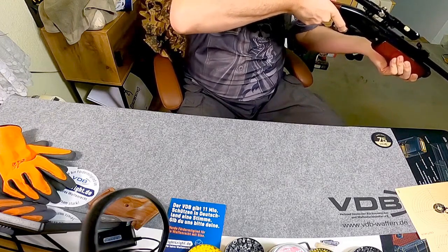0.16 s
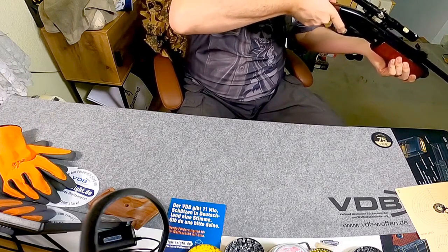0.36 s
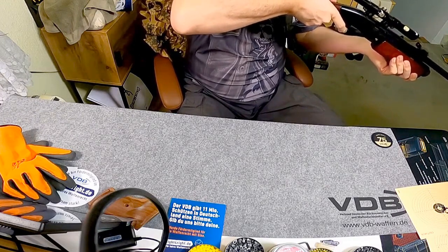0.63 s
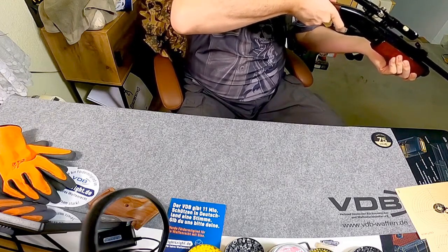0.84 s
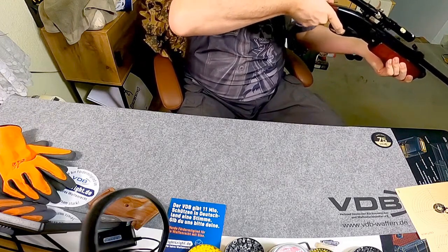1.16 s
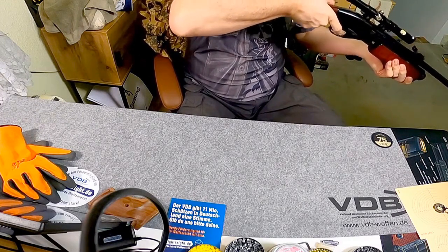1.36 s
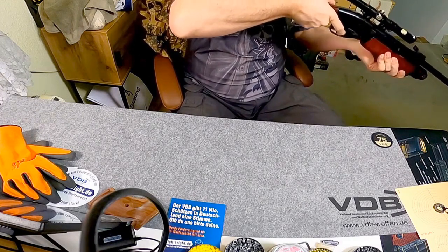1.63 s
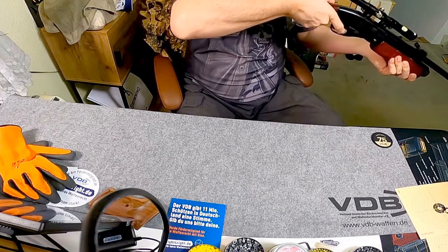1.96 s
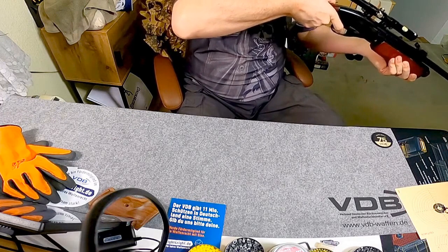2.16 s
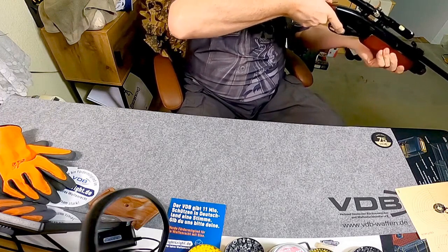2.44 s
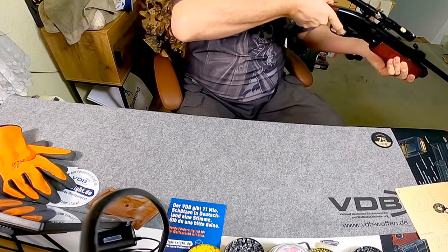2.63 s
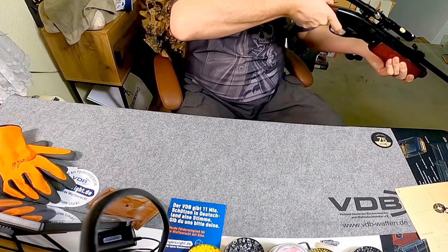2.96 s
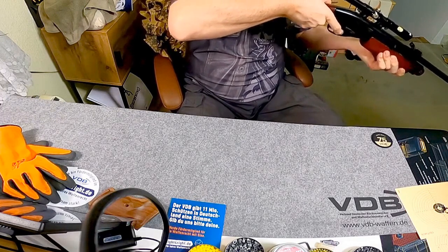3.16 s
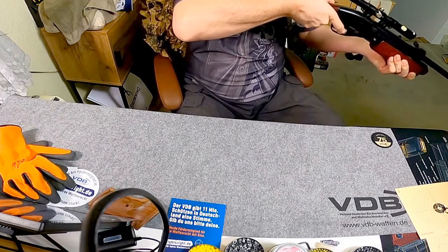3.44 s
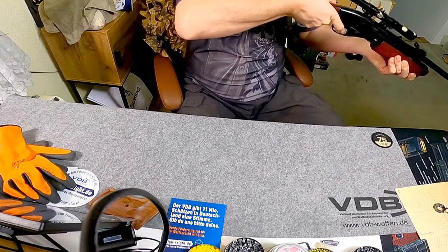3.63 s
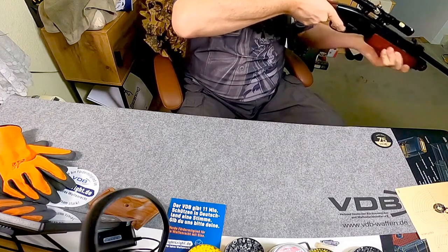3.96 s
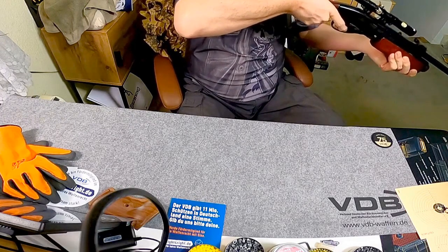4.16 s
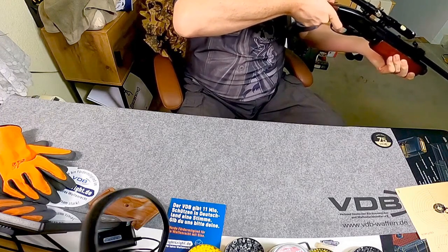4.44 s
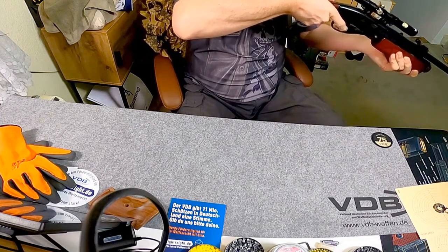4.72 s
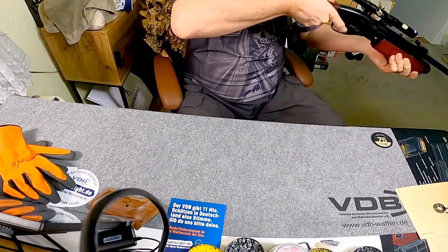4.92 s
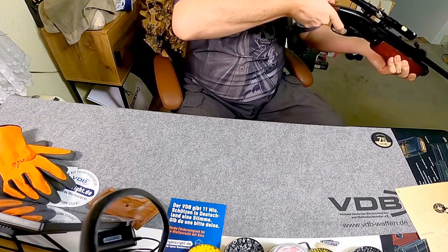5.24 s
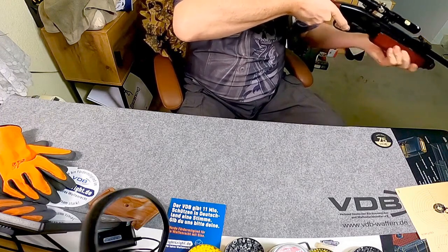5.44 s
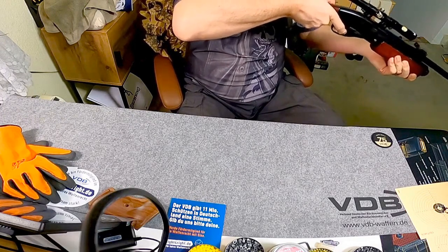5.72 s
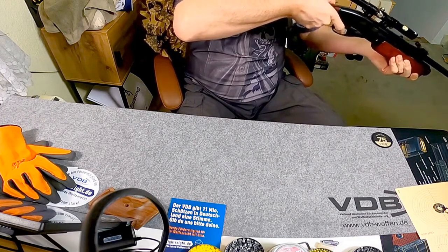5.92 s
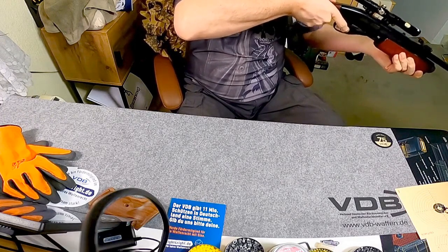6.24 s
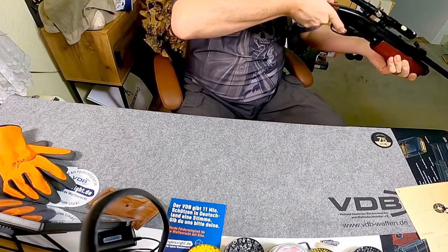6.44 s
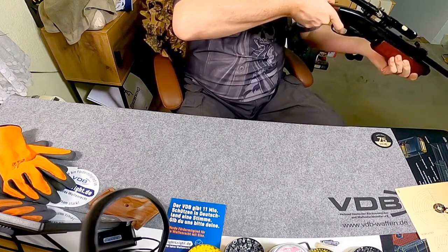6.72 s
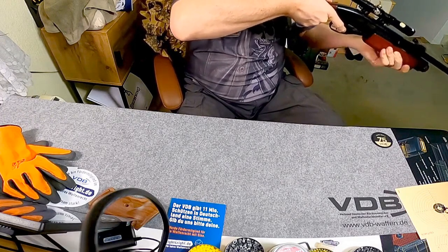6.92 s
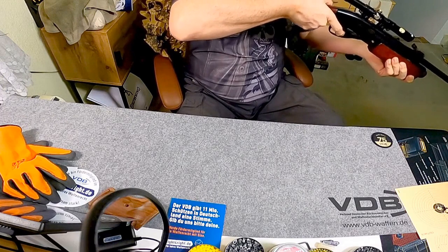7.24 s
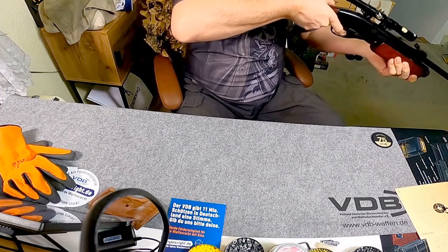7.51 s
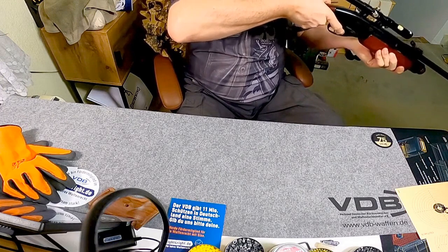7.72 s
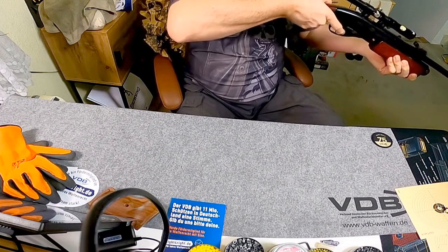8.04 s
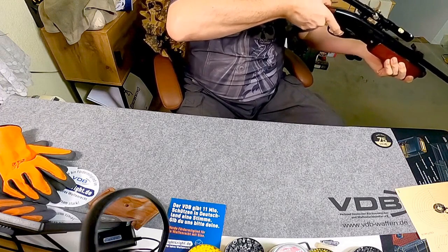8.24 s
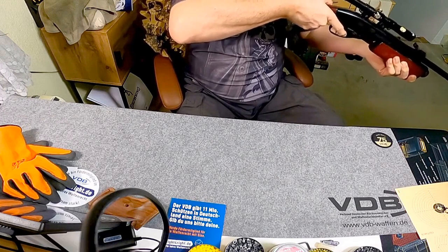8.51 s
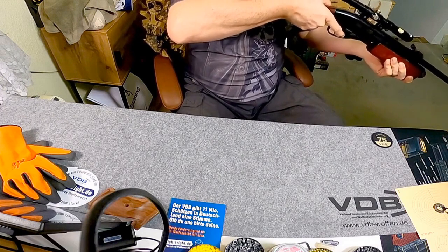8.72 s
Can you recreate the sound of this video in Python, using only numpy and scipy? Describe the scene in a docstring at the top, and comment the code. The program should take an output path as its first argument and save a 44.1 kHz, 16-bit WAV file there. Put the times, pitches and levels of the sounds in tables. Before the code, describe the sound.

A pump-action air rifle is cycled and fired eleven times in a small, quiet room, heard closely by one microphone in mono. At once two hard steel clacks, about a fiftieth of a second apart, leave a faint singing spring; near 0.15 s loose linkage rattles, and at 0.19 s the action shuts with a full clunk. After a pause, a light sear tick leads into a sharp, airy snap at 0.9 s. Almost fused with it, a pellet clangs on a steel trap, with scattering bits and a bright, fluttering ring of about a quarter second. Recocking starts around 1.15 s, and shots follow near 1.5, 2.2, 3.0, 3.8, 4.5, 5.3, 6.0, 6.8 and 7.6 s, slightly varied. The final cocking comes at 7.8 s; the shot at 8.4 s is only a snap and puff, without the steel ring. Faint hiss, low rumble and mains hum remain throughout.

```python
"""First come two hard clacks, a rattle and a clunk: a pump-action air rifle is cocked in a small, quiet room.
Then the sear ticks and the shot snaps, and the pellet rings a steel trap about a fiftieth of a second later.
Eleven such rounds follow each other; the last shot is empty, so the trap stays silent.
Blows are coloured noise bursts, ringing steel is a sum of modes, and near walls answer most contacts.
One microphone hears it all, over faint hiss, rumble and mains hum."""
import sys
import numpy as np
from scipy import signal
from scipy.fft import rfft, irfft, next_fast_len
from scipy.io import wavfile
from scipy.ndimage import uniform_filter1d

SR = 44100
rng = np.random.default_rng(int(sys.argv[2]) if len(sys.argv) > 2 else 0)


def master_out(mix):
    """Clip the mix to full scale and print it as 16-bit PCM to the path in sys.argv[1]."""
    frames = np.transpose(np.atleast_2d(mix))
    ceiling = np.clip(frames, -1, 1)
    pcm = np.round(ceiling * 32767).astype(np.int16)
    wavfile.write(sys.argv[1], SR, pcm)


N = 391166  # samples in the whole scene
SIZE, ONSET = 24576, 2205  # samples around one contact, and before it
T = (np.arange(SIZE) - ONSET) / SR  # seconds from the contact
AFTER = np.maximum(T, 0)


# the valve is struck and air leaves the muzzle: t/s, brightness/(dB per octave), sear lead/s, sear level/dB
SHOT_TIMES = [(0.9123, -0.5, 0.021, -18), (1.5098, 0.8, .016, -22), (2.2421, -0.5, 0.022, -23.5),
              (2.9711, -0.3, 0.018, -23), (3.7865, -0.5, .0205, -21.5), (4.545, 0, 0.019, -21),
              (5.271, 3, .02, -19), (5.9611, 1.5, .021, -22.5), (6.7762, 1, 0.025, -19),
              (7.5912, -0.5, .025, -17), (8.442, -1, 0.023, -20)]
# colour of the snap at the valve: f/Hz, level/(dB per Hz)
SNAP_COLOUR = [(40, -36), (95, -15), (150, 1), (230, -6.5), (350, -3), (600, -8.5), (1000, -14),
               (1600, -3.5), (3300, -3), (4280, 4.5), (5400, -1), (6400, -2), (8400, -15), (12400, -20.5),
               (15500, -36.5)]
# colour of the moving air: f/Hz, level/(dB per Hz)
AIR_COLOUR = [(40, -32), (95, -19), (155, -8), (230, -6), (450, -1), (750, -4), (1100, -6.5), (1700, -6.5),
              (3500, -11), (7200, -11.5), (13500, -16.5), (15500, -27.5)]
SHOT_DB = -5


def shots():
    """The sear lets go, the striker runs onto the valve, and a puff of air follows."""
    out = np.zeros(N)
    for s, bright_db, sear_lead, sear_db in SHOT_TIMES:
        sear = room(tick(), wet_db=5.0)
        add(out, s - sear_lead, amp(sear_db) * sear)
        run = amp(-16.5) * burst(AIR_COLOUR, swell(0.0098), tilt_db=0.5)
        snap = burst(SNAP_COLOUR, fade(0.024, attack=0.0016), bright_db)
        puff = amp(-12) * burst(AIR_COLOUR, fade(0.17, attack=0.0053), grain_db=0.0)
        add(out, s, amp(SHOT_DB) * room(run + snap + puff, wet_db=-4))
    return out


# pellets of the first ten shots, in order: flight/s, level/dB, ring level/dB, off-centre gain/dB
PELLET_HITS = [(.0235, -16, -4, -3), (.025, -17, -7, 3), (.022, -15, -10, -2), (.0225, -15, -8.5, -4.5),
               (.027, -16, -8.5, -5.5), (.0215, -15, -7.5, -4.5), (.0215, -13.5, -8.5, -1),
               (.0225, -15.5, -8, 3.5), (.017, -14.5, -7, 4.5), (.0215, -17, -6, 6)]
# colour of the blow on the trap: f/Hz, level/(dB per Hz)
CLANG_COLOUR = [(60, -54.5), (190, -25.5), (330, -4.5), (680, 1.5), (1000, -7), (1800, -2), (3300, -2.5),
                (4400, -5), (6500, -8.5), (9000, -12), (13600, -18.5), (15500, -35)]
# the trap's crowd of weak high modes
SHIMMER_LOW_HZ, SHIMMER_HIGH_HZ, SHIMMER_DB, SHIMMER_T60_S = 5980, 13000, -16.5, 0.2


def trap(count=30):
    """The pellet shatters on the steel box and its bits rattle; where it lands decides which modes ring most."""
    out = np.zeros(N)
    high_modes = [(hz, 0) for hz in rng.uniform(SHIMMER_LOW_HZ, SHIMMER_HIGH_HZ, count)]
    # the pellets run out before the last shot
    for (fired, *_), (flight, db, ring_db, off_centre_db) in zip(SHOT_TIMES, PELLET_HITS):
        impact = burst(CLANG_COLOUR, fade(0.028), tilt_db=2.0)
        rattle = fade(0.22, attack=0.0032) * amp(3.7 * wobble(299.9))
        bits = amp(-3.9) * burst(CLANG_COLOUR, rattle, tilt_db=-0.24)
        shimmer = amp(SHIMMER_DB) * ring(high_modes, scatter_db=5) * fade(SHIMMER_T60_S)
        steel = amp(ring_db) * plate(off_centre_db)
        hit = room(impact + bits, wet_db=-3.5) + shimmer + steel
        add(out, fired + flight, amp(db) * hit)
    return out


# modes of the steel trap: f/Hz, level/dB, share of the off-centre gain that the mode gets
TRAP_MODES = [(1857, -7.5, .3), (2654, -13, -.3), (3208, -8.5, 0), (3521, -7.5, .7), (4690, -15, 0),
              (4877, -8, 1.2), (5039, -1.5, -.8), (5110, -8, -.3), (5900, -5.5, -.7), (6480, -8.5, .2),
              (7200, -11, .2), (8425, -9.5, .7), (8872, -17, 0), (9959, -18, .5), (10826, -21, 0),
              (13400, -23, 0)]
TRAP_T60_S, TRAP_DAMPING = 0.29, 0.1  # ring time at 5 kHz; it shortens as this power of frequency


def plate(off_centre_db, scatter_db=2):
    """The trap's modes; echoes arriving by many paths make each one flutter, and high ones die sooner."""
    out = np.zeros(SIZE)
    for hz, db, share in TRAP_MODES:
        envelope = fade(TRAP_T60_S * (5000 / hz) ** TRAP_DAMPING, attack=0.0015)
        steady_path = 0.5 * np.exp(2j * np.pi * rng.random())
        paths = steady_path + wobble(118) + 1j * wobble(118)
        tone = np.real(paths * np.exp(2j * np.pi * hz * T))
        mode = unit(tone * envelope) * np.sqrt(np.mean(envelope ** 2))
        level_db = db + share * off_centre_db + scatter_db * rng.standard_normal()
        out += amp(level_db) * mode
    return out


# the fore-end is pulled back against its stop: t/s, level/dB, time from the catch to the stop/s
PULL_TIMES = [(0.017, -5.5, .016), (1.145, -5.5, .016), (1.7388, -5.5, .0235), (2.4939, -5.5, .015),
              (3.2152, -6, .0165), (4.0062, -6.5, 0.016), (4.7416, -5, .0167), (5.4455, -6, .0188),
              (6.1581, -6, .018), (6.976, -6, .019), (7.823, -5, .0165)]
CATCH_DB = -5.2  # the catch against the stop
CATCH_TILT_DB, STOP_TILT_DB = -0.5, -0.5  # dB per octave
SCRAPE_DB = -27.5


def pull_back():
    """Two clacks cock the action: the fore-end catches, scrapes along and meets its stop."""
    out = np.zeros(N)
    for s, db, travel in PULL_TIMES:
        add(out, s - travel, amp(db + CATCH_DB) * clack(CATCH_TILT_DB))
        stop = clack(STOP_TILT_DB) + amp(SCRAPE_DB) * scrape(travel)
        add(out, s, amp(db) * stop)
    return out


# colour of a hard contact in the action: f/Hz, level/(dB per Hz)
CLACK_COLOUR = [(40, -35), (95, -22.5), (150, -12.5), (350, -13), (630, -10), (1180, -9.5), (1770, 1.5),
                (2220, -7.5), (2780, -1.1), (3650, -5.5), (4090, -2.5), (5500, -13), (6140, -7),
                (7200, -17), (12600, -27), (15500, -35)]
# colour of the singing spring: f/Hz, level/(dB per Hz)
SPRING_COLOUR = [(120, -56), (200, -34), (376, -9), (550, -4.5), (659, 2), (734, -7.5), (1040, -2.5),
                 (1510, -14.5), (2380, 1), (4240, -14), (10500, -22.5), (15000, -31.5)]
# modes of the receiver, which the lock rings too: f/Hz, level/dB
RECEIVER_MODES = [(1814, -34.5), (2832, -33), (6105, -44.5), (7445, -56.5), (8360, -50), (11106, -55),
                  (12409, -58.5), (12866, -62.5)]
# modes of the barrel, which the lock rings too: f/Hz, level/dB
BARREL_MODES = [(390, -6), (660, -7), (745, -2.5), (1710, 1), (1870, -3), (2300, -5), (2620, -7),
                (2880, -7), (3680, -3.5)]


def clack(bright_db):
    """A hard contact in the action that leaves its spring and barrel singing."""
    rub = amp(-19.0) * burst(CLACK_COLOUR, swell(0.0063) + fade(0.072, attack=0.004))
    blow_envelope = fade(0.015, attack=0.0014) + amp(-15) * fade(0.08)
    blow = burst(CLACK_COLOUR, blow_envelope, bright_db, grain_db=2.5)
    receiver = amp(-17.5) * ring(RECEIVER_MODES, scatter_db=0.0, detune=0.03) * fade(0.054)
    spring = amp(-20.5) * burst(SPRING_COLOUR, fade(0.26))
    barrel = amp(-26.0) * ring(BARREL_MODES, scatter_db=5) * fade(0.21)
    return room(rub + blow + receiver + spring + barrel, wet_db=-13.5)


# colour of the fore-end scraping along its guide: f/Hz, level/(dB per Hz)
SCRAPE_COLOUR = [(40, -22), (100, -3), (160, 5), (350, 1.5), (700, -0.5), (1500, -3.5), (4000, -2.5),
                 (7000, -3.5), (9000, -2), (12500, -6), (15500, -13)]
SCRAPE_RISE_S, SCRAPE_OVERRUN_S, SCRAPE_FALL_S = 0.012, 0.012, 0.015  # it runs on a little past the stop


def scrape(travel):
    """Sliding noise that builds up to the catch and lasts until just after the stop at T = 0."""
    rise = np.exp(np.minimum(T + travel, 0) / SCRAPE_RISE_S)
    fall = np.exp(-np.maximum(T - SCRAPE_OVERRUN_S, 0) / SCRAPE_FALL_S)
    return burst(SCRAPE_COLOUR, rise * fall, grain_db=2.0)


# the fore-end is pushed forward:
# first touch t/s, time to take up the slack/s, chatter level/dB, lock t/s, lock level/dB
PUSH_TIMES = [(0.1433, .017, -6, 0.19, -2.5), (1.2672, 0.0056, -6, 1.3236, -4),
              (1.8464, 0.0061, -6.5, 1.896, -4.5), (2.6061, .0086, -8, 2.6573, -4),
              (3.3175, .0068, -6, 3.363, -7.5), (4.1067, 0.017, -7.5, 4.1548, -6.5),
              (4.8373, .007, -7.5, 4.891, -5.5), (5.5427, .0072, -8, 5.5956, -5.5),
              (6.2557, 0.0052, -8, 6.3032, -3.5), (7.0765, 0.0029, -13, 7.1283, -4.5),
              (7.9308, 0.0051, -7.5, 7.9783, -4.5)]


def push_forward():
    """The linkage chatters on the way forward, then the action locks."""
    out = np.zeros(N)
    for s, slack, chatter_db, lock_s, lock_db in PUSH_TIMES:
        for delay, db in chatter(slack):
            add(out, s + delay, amp(chatter_db + db) * room(tick(), wet_db=-8.5))
        add(out, lock_s, amp(lock_db) * lock())
    return out


TOUCH_DB = -6  # the first touch of the linkage, against its main knock
REBOUND_S, REBOUND_SHRINK = 0.012, 0.7  # typical first flight; each flight over the one before
REBOUND_LOSS_DB, REBOUND_SCATTER = 7, 0.2  # loss on each rebound; spread of the log of the flight


def chatter(slack, count=3):
    """The loose linkage touches, knocks with its slack taken up, and rebounds in shrinking hops: (delay s, dB)."""
    k = np.arange(count)
    scatter = np.exp(REBOUND_SCATTER * rng.standard_normal(count))
    flights = REBOUND_S * REBOUND_SHRINK ** k * scatter
    rebounds = zip(slack + np.cumsum(flights), -REBOUND_LOSS_DB * (k + 1))
    return [(0, TOUCH_DB), (slack, 0), *rebounds]


# colour of a light contact: f/Hz, level/(dB per Hz)
TICK_COLOUR = [(70, -50), (130, -44), (310, -31), (760, -6), (900, -23), (1060, -7.5), (1280, -17),
               (1500, -4.5), (1740, 8), (2290, -4.5), (2980, -6.5), (4760, -27.5), (6210, -17), (7450, -31),
               (12000, -34.5), (15500, -42)]
# modes of the linkage: f/Hz, level/dB
LINKAGE_MODES = [(1040, -7), (1590, -7.5), (1730, 5), (1860, 2), (2900, -11), (6220, -7.5), (8450, -15)]


def tick():
    """A light contact in the steel linkage, with a short rub around it; the sear makes the same sound."""
    contact = burst(TICK_COLOUR, fade(0.013, attack=0.0013))
    rub = amp(-17.5) * burst(CLACK_COLOUR, fade(0.039) + swell(0.0048), tilt_db=-1)
    steel = amp(-10) * ring(LINKAGE_MODES, scatter_db=1.5, detune=0.034) * fade(0.029)
    return contact + rub + steel


# colour of the closing action: f/Hz, level/(dB per Hz)
CLUNK_COLOUR = [(30, -25.5), (70, -13.5), (110, -13), (180, -8.5), (300, -6), (420, -5.5), (560, -0.5),
                (900, -5.5), (1370, -10.5), (1830, -2), (2270, -10.5), (2560, -2.5), (3300, -9.5),
                (3760, -6), (6690, -12.5), (9400, -20), (10800, -18.5), (15500, -31)]


def lock():
    """The fore-end slides home and shuts with a full clunk."""
    rub = amp(-23.5) * burst(CLUNK_COLOUR, swell(0.018) + fade(0.11), tilt_db=1.0, grain_db=1.5)
    clunk_envelope = fade(0.0096) + amp(-19) * fade(0.067)
    clunk = burst(CLUNK_COLOUR, clunk_envelope, tilt_db=-0.13, grain_db=2.5)
    receiver = amp(-21) * ring(RECEIVER_MODES, scatter_db=4.0, detune=0.009) * fade(0.04)
    barrel = amp(-31.5) * ring(BARREL_MODES, scatter_db=6) * fade(0.16)
    return room(rub + clunk + receiver + barrel, wet_db=-10)


# colour of the room tone: f/Hz, level/(dB per Hz)
QUIET_COLOUR = [(15, -12), (42, 1), (75, -15), (110, -12), (155, -2), (210, -8.5), (320, -5), (430, -7),
                (520, -9.5), (770, -10), (1000, -12.5), (2600, -15.5), (6500, -21.5), (15500, -27)]
QUIET_DB, HUM_DB, HUM_HZ = -60.5, -78.5, 150


def room_tone():
    """Faint steady hiss and rumble with a mains hum."""
    hum = amp(HUM_DB) * np.sin(2 * np.pi * HUM_HZ * np.arange(N) / SR)
    hiss = burst(QUIET_COLOUR, np.ones(next_fast_len(N)), grain_db=1.5)[:N]
    return amp(QUIET_DB) * hiss + hum


# how long the small room rings: f/Hz, time to fall 60 dB/s
ROOM_T60 = [(100, 0.43), (300, 0.17), (700, 0.22), (2000, 0.25), (5000, 0.21), (13000, 0.21)]


def room(x, wet_db, build=0.0013):
    """A sound with the answer of near walls, which dies at its own speed in each band."""
    hz, t, bands = signal.stft(rng.standard_normal(SR // 3), SR, nperseg=256)
    decay = amp(-60 * t / along(ROOM_T60, hz)[:, None])
    build_up = 1 - np.exp(-t / build)
    tail = signal.istft(bands * decay * build_up, SR, nperseg=256)[1]
    return x + amp(wet_db) * signal.fftconvolve(x, tail / np.linalg.norm(tail))[:SIZE]


def burst(spectrum, envelope, tilt_db=0, grain_db=3):
    """A cluster of tiny impacts under an envelope, coloured by the body and tilted per octave."""
    size = len(envelope)
    hz = np.fft.rfftfreq(size, 1 / SR)
    clumps = unit(uniform_filter1d(rng.standard_normal(size), size=40))
    force = rng.standard_normal(size) * amp(grain_db * clumps) * envelope
    gain = amp(along(spectrum, hz) + tilt_db * np.log2(hz + 100))
    # the level follows the envelope alone, whatever the colour
    return unit(irfft(rfft(force) * gain, size)) * np.sqrt(np.mean(envelope ** 2))


def ring(modes, scatter_db, detune=0.002):
    """Modes of total rms 1, at new strengths and slightly new pitches for every blow."""
    hz, db = np.transpose(modes)
    gain = amp(db + scatter_db * rng.standard_normal(len(hz)))
    hz = hz * (1 + detune * rng.standard_normal(len(hz)))
    cycles = hz[:, None] * T + rng.random((len(hz), 1))
    return unit(gain @ np.sin(2 * np.pi * cycles))


def fade(t60, attack=0.001):
    """The envelope of something struck at T = 0."""
    return amp(-60 * AFTER / t60) * (1 - np.exp(-AFTER / attack))


def swell(rise):
    """The envelope of a part that slides faster and faster until T = 0, then stops ten times as quickly."""
    return np.exp(-np.abs(T) / np.where(T < 0, rise, rise / 10))


def wobble(rate):
    """A random curve of straight lines around one contact, rate knots a second."""
    knots = rng.standard_normal(512)
    return unit(np.interp((T - T[0]) * rate, np.arange(len(knots)), knots))


def add(track, s, x):
    """Lay a sound into the track with its contact at s."""
    start = round(s * SR) - ONSET
    part = x[max(-start, 0):N - start]
    track[max(start, 0):][:len(part)] += part


def amp(db):
    """Decibels to gain."""
    return 10 ** (np.asarray(db) / 20)


def unit(x):
    """Scale to rms 1."""
    return x / np.sqrt(np.mean(x ** 2) + 1e-20)


def along(points, hz):
    """Interpolate (Hz, value) points on a log frequency axis."""
    f, v = np.transpose(points)
    return np.interp(np.log(hz + 1), np.log(f + 1), v)


def scene():
    """One microphone in the room, the same in both channels."""
    mono = shots() + trap() + pull_back() + push_forward() + room_tone()
    return np.array([mono, mono])


PEAK_LIMIT, TOP_HZ = 0.62, 15500  # peaks never pass the limit before the low-pass; half amplitude at TOP_HZ


def record(dry):
    """The recorder rounds off the highest peaks and cuts steeply above its band limit."""
    rounded = dry / (1 + np.abs(dry / PEAK_LIMIT) ** 4) ** (1 / 4)
    size = next_fast_len(N + SR // 2)
    low_pass = 1 / (1 + (np.fft.rfftfreq(size, 1 / SR) / TOP_HZ) ** 120)
    return irfft(rfft(rounded, size) * low_pass, size)[:, :N]


dry = scene()
out = record(dry)
master_out(out)
```